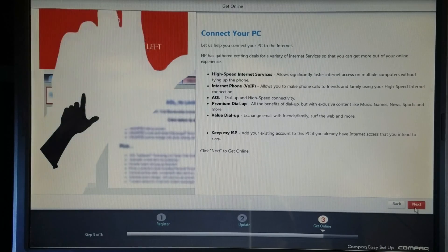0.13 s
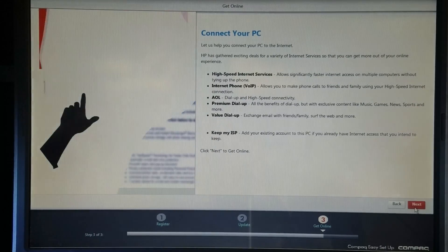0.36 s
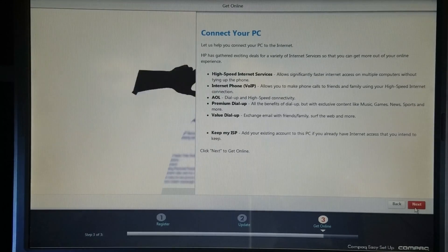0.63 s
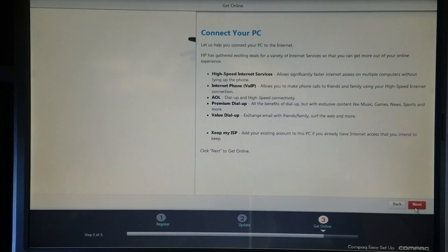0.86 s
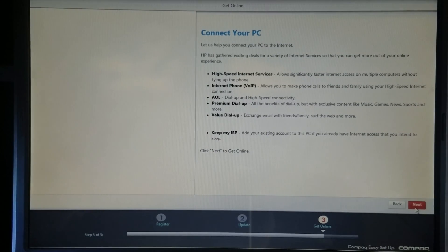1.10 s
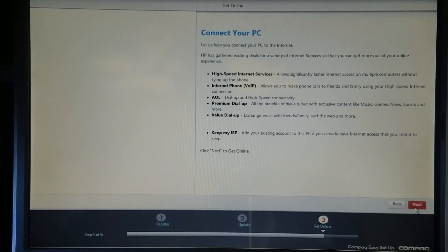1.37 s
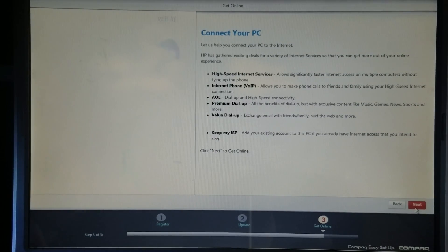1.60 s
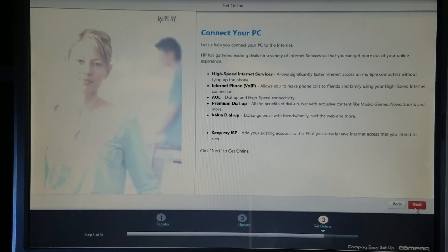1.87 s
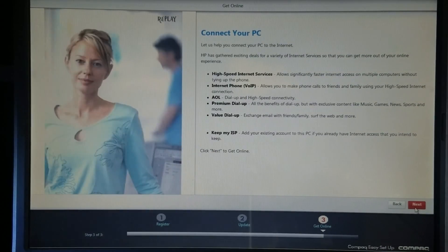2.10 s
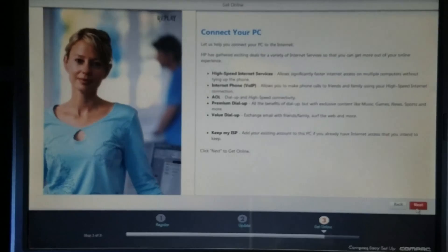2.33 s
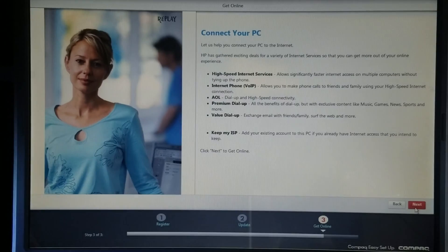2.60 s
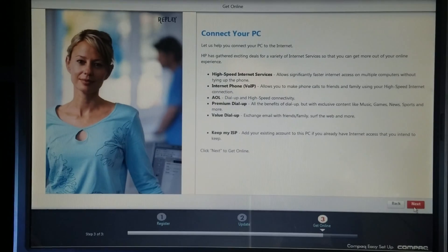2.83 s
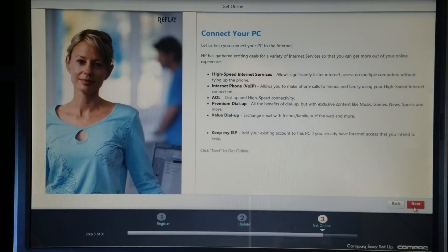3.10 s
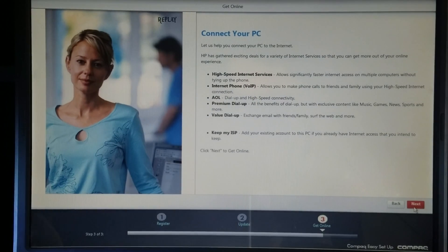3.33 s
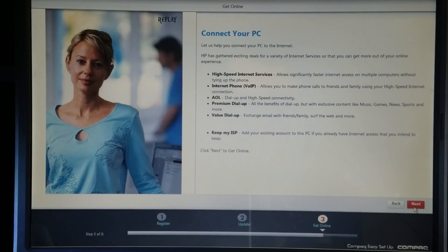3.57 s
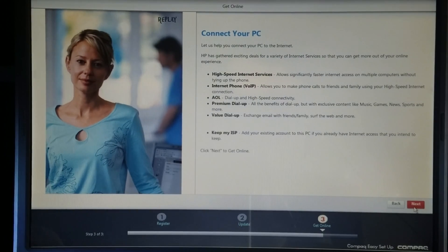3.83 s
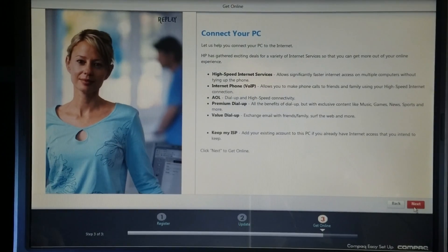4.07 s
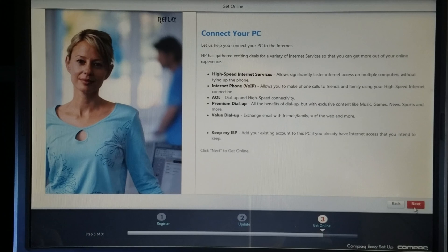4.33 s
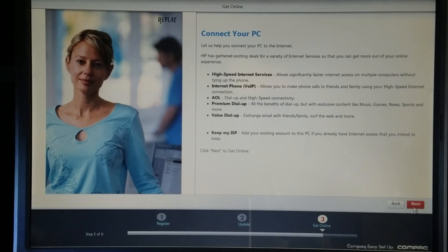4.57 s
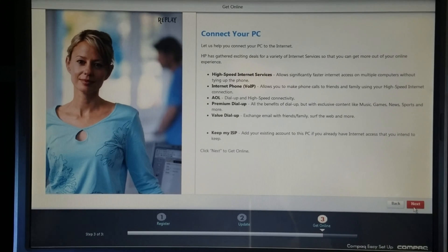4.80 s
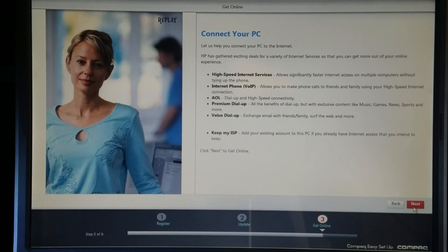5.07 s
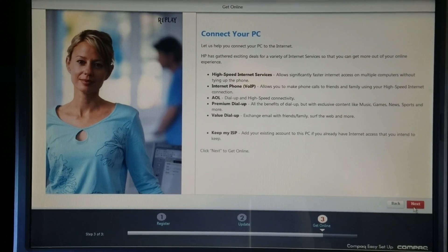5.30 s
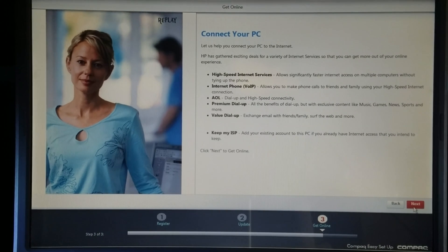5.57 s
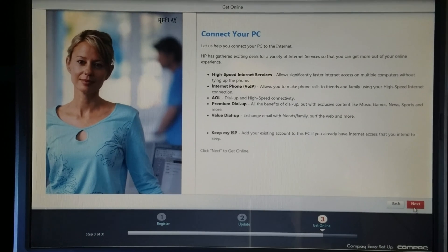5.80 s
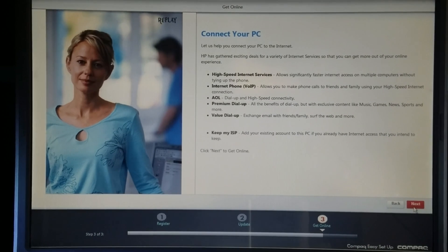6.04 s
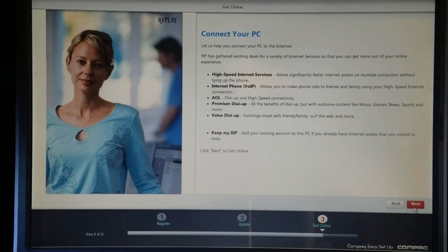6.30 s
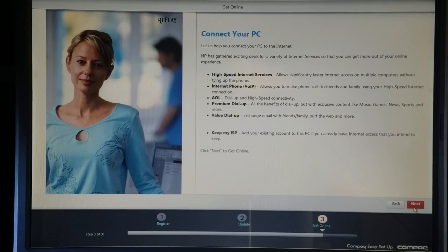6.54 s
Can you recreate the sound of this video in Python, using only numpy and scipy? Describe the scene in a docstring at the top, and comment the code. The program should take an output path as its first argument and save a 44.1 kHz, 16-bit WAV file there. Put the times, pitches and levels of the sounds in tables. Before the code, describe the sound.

Close indoor stereo with faint hiss. A small plastic plug ticks and scuffs sparsely against a plastic case, left of centre, with faint sleeve rustles. Ticks grow clearer, then one extremely loud, bright latch snap cracks near four seconds with a short small-room tail. After a brief lull, fingers rub and jolt the microphone casing with low rumble and crackly scrapes until the end.

```python
"""Microphone hiss and the first rustles of a sleeve open an indoor scene: strokes of fluttering noise.
A cable plug is fumbled against a plastic laptop case on the left, then its latch snaps home: rattling
contacts ring the modes of the parts, and a small room answers from sparse decaying taps. Later the
fingers that hold the camera shift and rub its casing: filtered one-way jolts and short damped sines
that shake the two microphones in opposite senses, over a low rumble of filtered noise."""
import sys
import numpy as np
from scipy import signal
from scipy.fft import rfft, irfft, next_fast_len
from scipy.io import wavfile
from scipy.ndimage import uniform_filter1d

SR = 44100
rng = np.random.default_rng(int(sys.argv[2]) if len(sys.argv) > 2 else 0)


def how_loud(loudness_db):
    """Turn decibels into a plain amplitude multiplier (0 dB gives 1, 20 dB gives 10)."""
    steps = np.asarray(loudness_db, float) / 20
    return 10 ** steps


def wav_out(sig):
    """Save sig, one row per channel (or a flat mono array), as 16-bit PCM at SR to the path in sys.argv[1]."""
    wavfile.write(sys.argv[1], SR, np.round(np.clip(np.atleast_2d(sig).T, -1, 1) * 32767).astype(np.int16))


N = 294147  # length in samples


def evened(x):
    """Scales to rms 1, all channels together."""
    return x / np.sqrt(np.mean(x ** 2) + 1e-20)


def read(points, hz):
    """Reads a spectrum table on a log-frequency axis."""
    table_hz, value = np.transpose(points)
    return np.interp(np.log(hz + 1), np.log(table_hz + 1), value)


def fader(rows):
    """Turns a table of seconds and dB into a gain for every sample."""
    s, db = np.transpose(rows)
    return how_loud(np.interp(np.arange(N) / SR, s, db))


def coloured(x, points):
    """Filters x by a spectrum table and scales it to rms 1."""
    size = next_fast_len(N)
    gain = how_loud(read(points, np.fft.rfftfreq(size, 1 / SR)))
    return evened(irfft(rfft(x, size) * gain, size)[..., :N])


def delayed(x, s):
    """Delays by any fraction of a sample, as a phase slope."""
    size = next_fast_len(N)
    turn = np.exp(-2j * np.pi * np.fft.rfftfreq(size, 1 / SR) * s)
    return irfft(rfft(x, size) * turn, size)[:N]


def add(mix, s, sound):
    """Mixes a sound in at time s."""
    part = mix[..., round(s * SR):][..., :sound.shape[-1]]
    part += sound[..., :part.shape[-1]]


# Colour of the hiss. Each row: frequency in Hz, relative level in dB per Hz.
HISS_COLOUR = [(12, -20.5), (20, -2), (60, -3), (175, -10.5), (440, -16), (1000, -19.5), (2600, -25.5),
               (6000, -30.5), (11000, -33), (12500, -36.5), (14000, -38), (15500, -42.5)]
# How alike the hiss is on both sides. Each row: frequency in Hz, left-right correlation (-1 to 1).
HISS_LIKENESS = [(60, -0.034), (640, -0.054), (1400, -0.054), (3000, 0.067), (7000, 0.13), (15000, .05)]
HISS_DB = -54  # rms


def hiss():
    """Steady microphone and room noise, nearly unrelated left and right."""
    left, other = rfft(rng.standard_normal((2, N)))
    same = read(HISS_LIKENESS, np.fft.rfftfreq(N, 1 / SR))
    right = same * left + np.sqrt(1 - same ** 2) * other
    return how_loud(HISS_DB) * coloured(irfft(np.array([left, right]), N), HISS_COLOUR)


# Strokes of the sleeve. Each row: middle in seconds, length in seconds, level in dB,
# nearness (0-1: near cloth keeps its body, far cloth is only a swish).
SLEEVE_STROKES = [(.15, .14, -63, 0.62), (.5, 0.22, -62.5, 0.3), (.6, 0.041, -62.5, .2),
                  (1.3, 0.15, -59, 0.68), (1.46, 0.13, -60.5, 0.38), (1.57, 0.062, -61.5, .05),
                  (1.72, .07, -65, .05), (1.81, 0.078, -63, .1), (1.9, 0.037, -66, .1),
                  (2.13, 0.057, -63.5, .1), (2.2, 0.067, -64.5, .1), (4.52, 0.12, -55, 0.44),
                  (4.75, .25, -65.5, .4), (5.01, 0.17, -57, 0.51), (5.15, 0.14, -61, 0.69),
                  (5.4, 0.3, -61.5, 0.7), (5.74, 0.3, -51.5, 0.82), (6.029, 0.12, -60.5, 0.47),
                  (6.14, 0.29, -59, 0.4), (6.5, 0.37, -66, 0.47)]
# Colour of far cloth. Each row: frequency in Hz, relative level in dB per Hz.
FAR_CLOTH = [(300, -35), (3000, -3.5), (5500, -0.5), (8000, 5), (12500, -1), (15500, -31)]
# Colour of near cloth. Each row: frequency in Hz, relative level in dB per Hz.
NEAR_CLOTH = [(150, -19), (500, 6.5), (1000, 2.5), (2700, -1.5), (6000, -10.5), (11400, -17), (15000, -32)]


def sleeve():
    """Fibres scraping in soft strokes: fluttering noise, mostly alike left and right, fuller when near."""
    t, far, near = np.arange(N) / SR, np.zeros(N), np.zeros(N)
    for middle, length, db, nearness in SLEEVE_STROKES:
        stroke = how_loud(db) * np.exp(-(1.8 * (t - middle) / length) ** 2)
        far += (1 - nearness) * stroke
        near += nearness * stroke
    common, left, right, flutter = rng.standard_normal((4, N))
    flutter_db = 1.85 * evened(uniform_filter1d(flutter, 120))
    fibres = (common + 0.57 * np.array([left, right])) * how_loud(flutter_db)
    return far * coloured(fibres, FAR_CLOTH) + near * coloured(fibres, NEAR_CLOTH)


# Rise and fall of the low rumble. Each row: time in seconds, level in dB.
RUMBLE_LEVEL = [(0, -64), (.25, -49), (1.2, -66), (1.5, -58), (2.4, -64), (4.2, -57.5), (4.35, -50),
                (4.88, -50), (4.95, -41), (5.1, -43), (5.18, -36.5), (5.4, -48), (5.8, -50), (5.88, -35),
                (5.95, -34.5), (6.02, -45), (6.08, -40.5), (6.28, -48.5), (6.67, -56.5)]
# Colour of the rumble. Each row: frequency in Hz, relative level in dB per Hz.
RUMBLE_COLOUR = [(5, -21.5), (12, -3), (24, -4), (50, -12.5), (90, -17.5), (200, -29.5), (500, -62)]


def rumble():
    """Low rumble, largely opposed left and right; strongest from 4.9 to 6.1 s."""
    left, other = rng.standard_normal((2, N))
    return fader(RUMBLE_LEVEL) * coloured(np.array([left, 0.44 * other - left]), RUMBLE_COLOUR)


# Single sharp slips of a finger. Each row: start in seconds, level in dB before its decay,
# pitch in Hz, length in cycles.
FINGER_SLIPS = [(5.083, -27.5, 1800, 0.67), (5.09, -29, 900, 1.), (5.173, -29.5, 1500, 1.1),
                (5.732, -33, 1400, 1.2), (5.964, -32.5, 2660, 1.7), (6.108, -36.5, 1100, 1.2),
                (6.138, -36, 1500, 1.1), (6.212, -33, 900, 1.2), (6.228, -28, 1500, 0.86),
                (6.25, -25.5, 1080, 1.5), (6.276, -31, 1400, 1.1), (6.451, -26, 2500, 1.3),
                (6.587, -34, 1406, 1.2), (6.617, -23.5, 1900, 0.37)]


def finger_slips():
    """Each sharp slip kicks the casing: a sine that dies within a cycle or so."""
    out = np.zeros(N)
    for s, db, hz, cycles in FINGER_SLIPS:
        turns = np.arange(800) * hz / SR
        add(out, s, how_loud(db) * np.sin(2 * np.pi * turns) * np.exp(-2 * turns / cycles))
    return out


# Resting pressure of the fingers on the casing. Each row: time in seconds, gain in dB.
PRESSURE = [(4.2, -75), (4.35, -62.5), (4.92, -61), (5.05, -53.5), (5.21, -53.5), (5.36, -44.5),
            (5.42, -45.5), (5.5, -53.5), (5.8, -52), (6.0, -57.5), (6.32, -63.5), (6.66, -54)]
# Scrapes of a finger. Each row: start in seconds, swell in seconds, hold in seconds, gain in dB,
# bite (extra dB of the upper band).
SCRAPES = [(4.84, 0.011, 0.025, -47.5, -3.5), (4.943, .01, 0.015, -48.5, -5),
           (5.04, 0.013, .018, -45.5, -8), (5.106, 0.024, .022, -42, 1), (5.164, 0.011, 0.0085, -42.5, -1),
           (5.415, .04, .025, -40.5, 1.5), (5.513, .035, .012, -52, 1), (5.63, 0.049, 0.044, -57, -1),
           (5.816, .008, 0.039, -48, -4), (6.011, .026, 0.014, -50, 0), (6.095, .012, .035, -56, 1),
           (6.186, .005, .008, -47, -1), (6.203, 0.024, 0.069, -48.5, 0.5), (6.557, 0.029, .015, -55, 1)]
SCRAPE_RELEASE_S, BITE_HZ = 0.0076, 900  # decay time; where the upper band begins


def rubbing(skin):
    """Rides skin noise in two bands: resting pressure, plus scrapes that swell, hold and let go quickly."""
    t = np.arange(N) / SR
    level = fader(PRESSURE) * np.ones((2, 1))
    for s, swell, hold, db, bite_db in SCRAPES:
        rise = np.clip((t - s) / swell, 0, 1) ** 2
        fall = np.exp(-np.maximum(t - s - swell - hold, 0) / SCRAPE_RELEASE_S)
        level += how_loud(db + bite_db * np.array([[0], [1]])) * rise * fall
    body = signal.lfilter(*signal.butter(1, BITE_HZ, fs=SR), skin)
    return level[0] * body + level[1] * (skin - body)


# Colour of the rubbed casing. Each row: frequency in Hz, relative level in dB per Hz.
CASING_COLOUR = [(60, -9.5), (250, -2.5), (500, -3), (1150, -7), (2200, -14.5), (4800, -29), (15000, -45.5)]
JOLTS_PER_S, RIGHT_LEAD_S, UNSHARED_DB = 1500, .00005, -7.5
# Raises the right and lowers the left by this much; the slipping finger sits nearer the right port.
RUB_RIGHT_DB, SLIP_RIGHT_DB = -0.6, 4


def grip():
    """Skin sticks and slips on the casing: one-way jolts, more than a hiss; low rumble lies under them."""
    jolt_db = 2.5 * np.minimum(rng.exponential(1, (3, N)), 4)
    jolts = how_loud(jolt_db) * (rng.random((3, N)) < JOLTS_PER_S / SR)
    smear = rng.standard_normal((3, N))
    skin = coloured(evened(jolts - jolts.mean()) + .7 * smear, CASING_COLOUR)
    shake, *own = rubbing(skin)  # shared by both microphones, then one part for each
    slips = finger_slips()
    left = shake / how_loud(RUB_RIGHT_DB) + slips / how_loud(SLIP_RIGHT_DB)
    right = shake * how_loud(RUB_RIGHT_DB) + slips * how_loud(SLIP_RIGHT_DB)
    opposed = np.array([delayed(left, RIGHT_LEAD_S), -right])
    return opposed - how_loud(UNSHARED_DB) * np.array(own) + rumble()


# Decay of the room. Each row: frequency in Hz, time to fall 60 dB in seconds.
ROOM_DECAY = [(300, 0.31), (1200, 0.43), (3000, 0.28), (7000, .22), (14000, 0.2)]
ROOM_DB = -9.5


def room(x):
    """Sparse taps of random sign, partly common to both microphones, each band dying at its own speed."""
    taps = np.zeros((3, SR // 2))
    at = np.arange(160, SR // 2 - 20, 20)
    at = at + rng.integers(0, 20, (3, len(at)))
    np.put_along_axis(taps, at, rng.choice([-1., 1.], at.shape), 1)
    hz, t, bands = signal.stft(taps[:2] + 2.0 * taps[2], SR, nperseg=256)
    decay = how_loud(-60 * t / read(ROOM_DECAY, hz)[:, None])
    tail = signal.istft(bands * decay, SR, nperseg=256)[1]
    tail = tail / np.linalg.norm(tail[0])
    return how_loud(ROOM_DB) * signal.fftconvolve(x, tail, axes=1)[:, :N]


# How the pair of microphone ports hears the plug's side. Each row: frequency in Hz,
# lead of the left in radians, left over right in dB.
PORT_PAIR = [(200, 1.1, 1.5), (690, 0.8, -3.5), (1360, 1.6, 8.5), (2200, 5.6, 4), (3150, 4.7, 1),
             (4150, 7.9, 8), (5000, 11.5, 4), (7000, 12, 1.5), (10300, 13.2, -2), (13000, 15.6, -8)]


def ports(pair):
    """The direct path to the two ports: the right lags in phase, and the balance varies with frequency."""
    hz = np.fft.rfftfreq(N, 1 / SR)
    lead, balance_db = (read(np.array(PORT_PAIR)[:, [0, k]], hz) for k in (1, 2))
    half = how_loud(balance_db / 2)
    return irfft(rfft(pair) * [half, np.exp(-1j * lead) / half], N)


def causal(gain):
    """Gives a colour the minimum phase, so that it acts only after the blow."""
    log_gain = np.log(np.maximum(np.r_[gain, gain[-2:0:-1]], 1e-5))
    return np.exp(np.conj(signal.hilbert(log_gain)))[:len(gain)]


def knock(modes, peak_db, pan_db, bright_hz, octaves, contact_ms, chatter):
    """A rattling contact cracks and rings the modes near its brightness: left, right, towards the walls."""
    t = np.arange(2048) / SR
    hz, width, db = np.transpose(modes)[:, :, None]
    hz = hz * (1 + 0.0154 * chatter[2, :len(modes), None])  # the grip detunes the part a little
    ring = how_loud(db) * width / SR * np.exp(-np.pi * width * t) * np.sin(2 * np.pi * hz * t)
    ring[0, 0] += 0.21  # the crack itself
    body = rfft(ring.sum(0), 4096)

    rattle = chatter[0] + .4 * chatter[:2]
    force = rfft(rattle * np.exp(-1000 * t / contact_ms), 4096)
    force = force / np.sqrt(uniform_filter1d(abs(force) ** 2, size=50, axis=1))  # no broad band favoured

    above = np.log2(np.fft.rfftfreq(4096, 1 / SR) / bright_hz + 1e-9) / octaves
    low_cut = np.abs(signal.freqz([1, -2, 1], [1, -1.92, .925], 2049)[1])  # small parts give no bass
    colour = causal(low_cut / (1 + above ** 2))
    walls = causal(uniform_filter1d(abs(body), size=24))  # over all directions the modes blur a little
    sound = irfft(colour * np.array([*(body * force), walls]), 4096)[:, :2048]
    pan = pan_db * np.array([[.5], [-.5], [0]])
    return sound / abs(sound[:2]).max() * how_loud(peak_db + pan)


# The laptop's shell taking the snap: pitch in Hz, level in dB before its decay, decay in cycles.
SHELL_THUMP = (160, -33, 0.25)


def shell_thump():
    """The laptop's shell takes the blow: a low sine dying in a fraction of a cycle."""
    hz, db, cycles = SHELL_THUMP
    turns = np.arange(2048) * hz / SR
    return how_loud(db) * np.sin(2 * np.pi * turns) * np.exp(-turns / cycles)


# Plug tip ticking and scuffing the case. Each row: start in seconds, peak in dB before pan and ports,
# brightest frequency in Hz, spread in octaves, contact decay in ms.
TICKS = [(.327, -42, 1800, 2.1, 11), (.388, -45.5, 1400, 1, 3), (.463, -33, 5000, 2.5, 4.3),
         (.6, -56, 3000, 0.32, 8), (.645, -53, 2800, .4, 3), (1.266, -44.5, 8000, 2, 5.6),
         (1.33, -45.5, 6900, .45, 5.3), (1.341, -34.5, 9100, 1.2, 1.2), (2.362, -26.5, 6000, 2.15, 1.5),
         (2.400, -34.5, 3000, 1.5, 2.7), (2.58, -40.5, 2470, 1.1, 2.3), (2.680, -42.5, 6000, 2.3, 1.3),
         (2.686, -39, 2200, 1.1, 5.4), (2.870, -30, 3900, 2.2, 3.2), (2.909, -44, 3350, 0.4, 8),
         (3.162, -46.5, 6000, 1.5, 7), (3.186, -37.5, 3000, 1.25, 2.3), (3.214, -41, 6000, .9, 2),
         (3.49, -32.5, 3640, 0.5, 1.7), (3.934, -33.5, 5660, 1.3, 1.7)]
# Dull knocks of the plug's body just behind a tick. Each row: start in seconds,
# peak in dB before pan and ports, brightest frequency in Hz.
BODY_KNOCKS = [(.336, -45, 1140), (.473, -39.5, 1140), (1.345, -51.5, 500), (2.367, -38, 1700),
               (2.405, -47.5, 1200), (2.584, -43.5, 704), (2.692, -44, 1120), (2.875, -39, 1170),
               (3.189, -44, 704)]
KNOCK_OCTAVES, KNOCK_MS = .8, 11.1
# The latch snapping home, one row with the columns of a tick.
LATCH_SNAP = (3.976, 3.3, 8970, 1.025, 1.34)
# Modes of the plastic case. Each row: frequency in Hz, width in Hz, level in dB.
CASE_MODES = [(620, 230, -7.5), (900, 190, 0.5), (1290, 210, 1), (2090, 370, -1.5), (3000, 530, -6.5),
              (4500, 210, -9.5), (6100, 500, -12.5), (9400, 500, -11.5)]
# Modes of the latch. Each row: frequency in Hz, width in Hz, level in dB.
LATCH_MODES = [(1250, 250, 0.5), (2276, 170, 9), (2520, 330, 5.5), (4290, 330, 5), (6040, 320, 1),
               (6500, 120, -0.5), (6900, 210, 8), (8150, 280, -0.5), (8720, 230, 5.5), (9550, 275, 4),
               (11600, 460, -2.5), (12900, 500, 5), (15230, 320, -4)]
TICK_PAN_DB, KNOCK_PAN_DB, SNAP_PAN_DB = 5, 3, 5  # left over right, before the ports


def plug():
    """Ticks, knocks and the latch snap strike their modes, heard through the two ports and the room."""
    blows = [(s, CASE_MODES, db, TICK_PAN_DB, hz, octaves, ms) for s, db, hz, octaves, ms in TICKS]
    blows += [(s, CASE_MODES, db, KNOCK_PAN_DB, hz, KNOCK_OCTAVES, KNOCK_MS) for s, db, hz in BODY_KNOCKS]
    snap_s, snap_db, *snap_contact = LATCH_SNAP
    blows += [(snap_s, LATCH_MODES, snap_db, SNAP_PAN_DB, *snap_contact)]
    out = np.zeros((3, N))  # left, right, towards the walls
    for s, *blow in blows:
        add(out, s, knock(*blow, rng.standard_normal((3, 2048))))
    add(out, snap_s, shell_thump())
    return ports(out[:2]) + room(out[2:])


def scene():
    """Hiss, sleeve and grip around the plug in its room."""
    return hiss() + sleeve() + grip() + plug()


def roll_off(x):
    """The treble ends steeply here."""
    return signal.sosfilt(signal.butter(12, 15480, fs=SR, output="sos"), x)


def record(dry):
    """The input clips at full scale, which the snap just overloads."""
    mix = np.clip(dry, -1, 1)
    return roll_off(mix)


dry = scene()
out = record(dry)
wav_out(out)
```